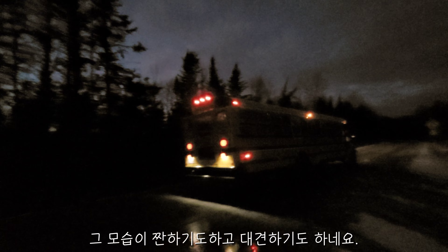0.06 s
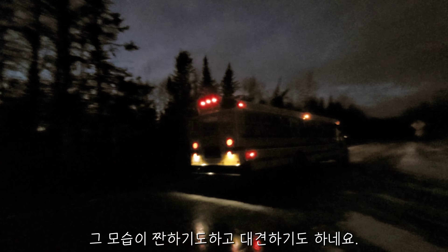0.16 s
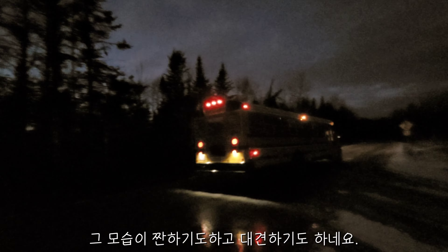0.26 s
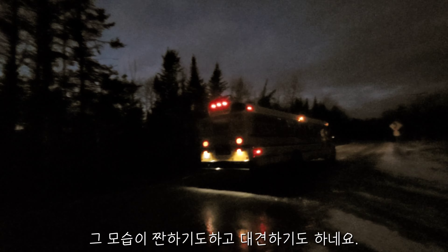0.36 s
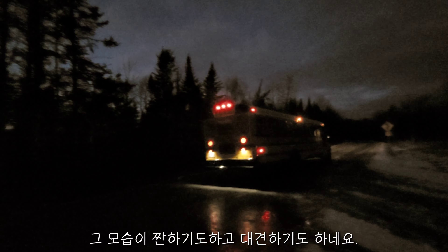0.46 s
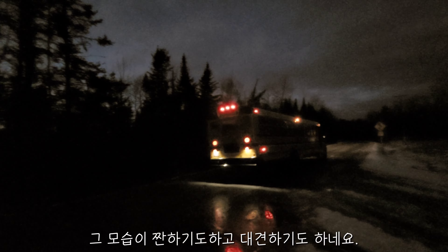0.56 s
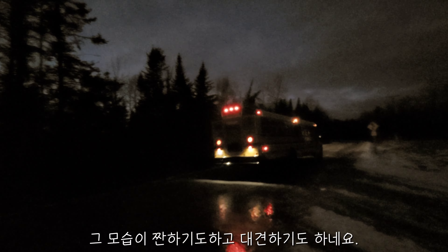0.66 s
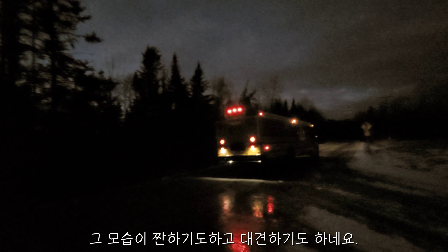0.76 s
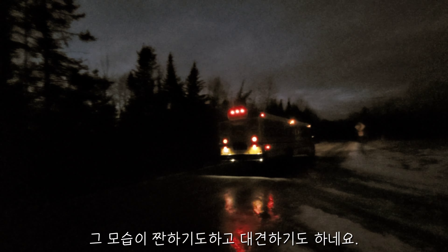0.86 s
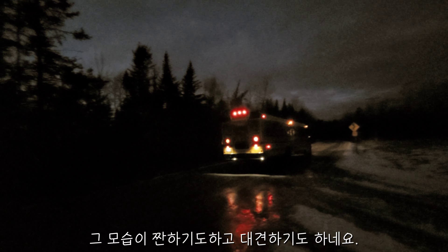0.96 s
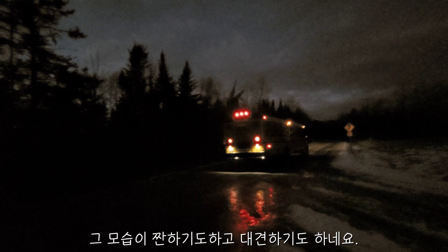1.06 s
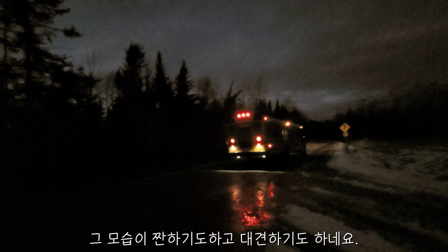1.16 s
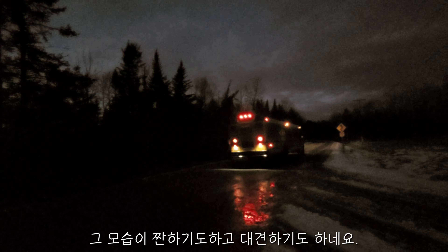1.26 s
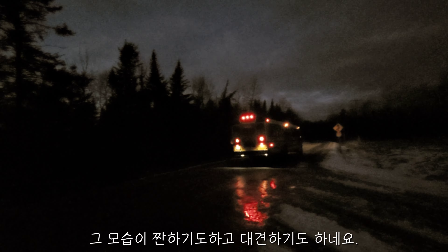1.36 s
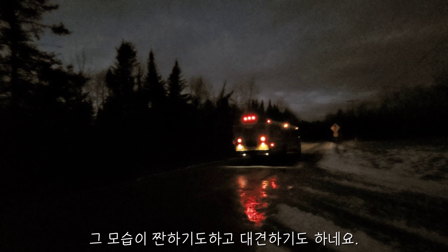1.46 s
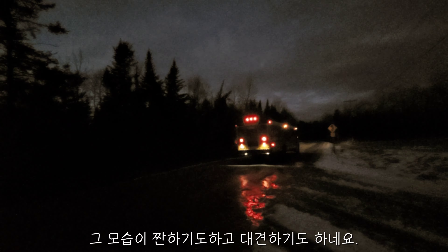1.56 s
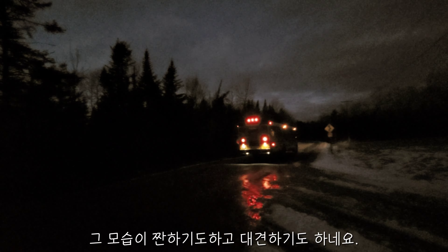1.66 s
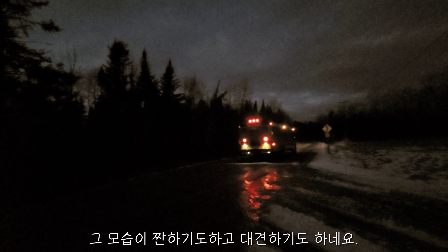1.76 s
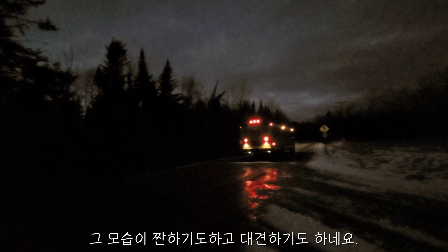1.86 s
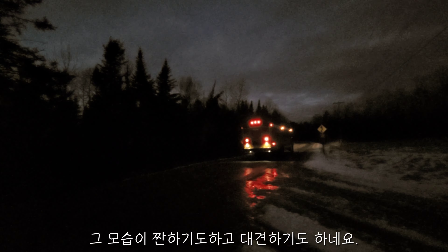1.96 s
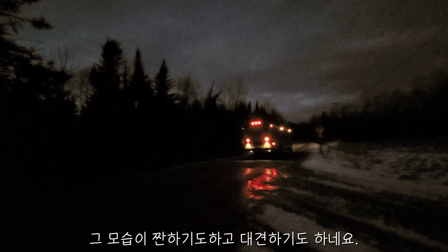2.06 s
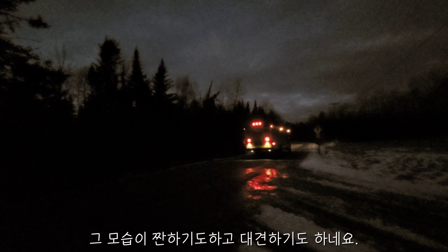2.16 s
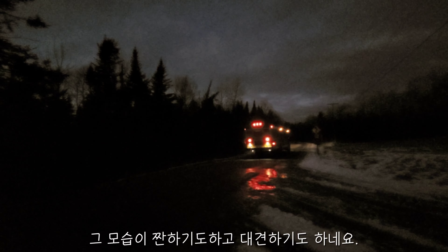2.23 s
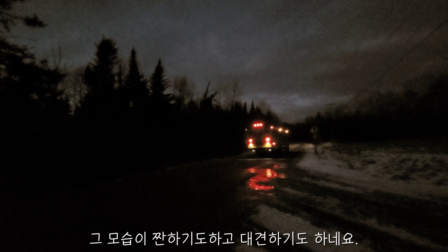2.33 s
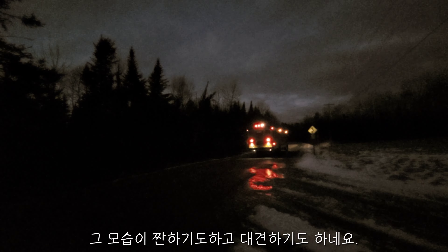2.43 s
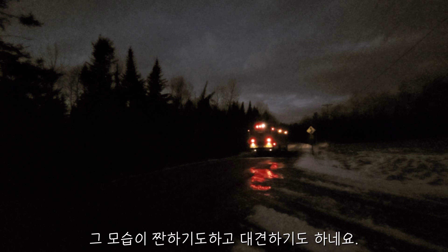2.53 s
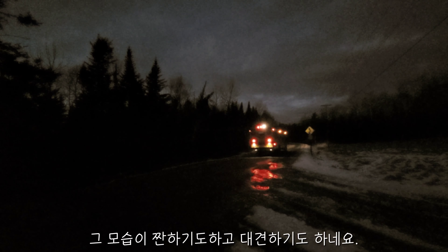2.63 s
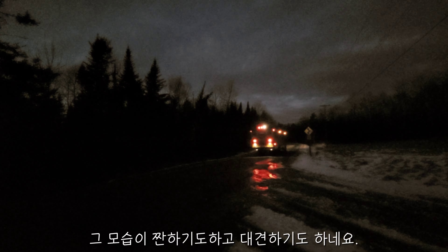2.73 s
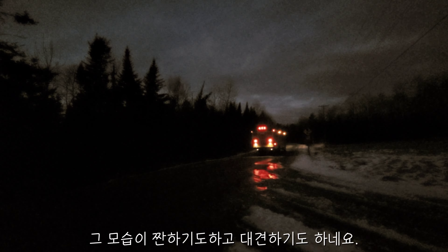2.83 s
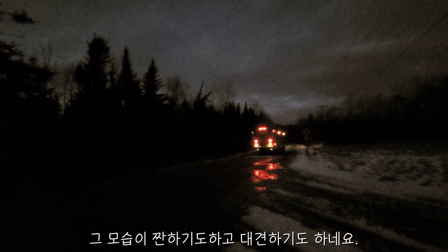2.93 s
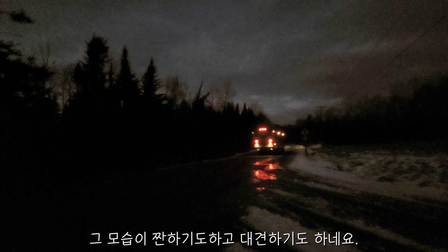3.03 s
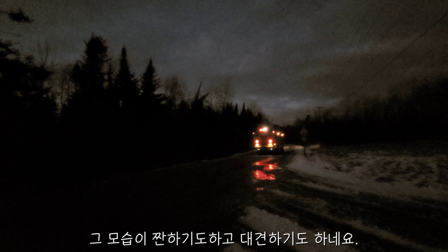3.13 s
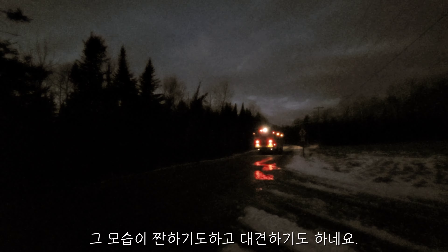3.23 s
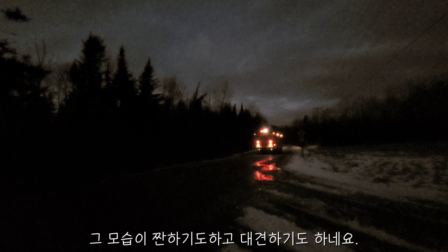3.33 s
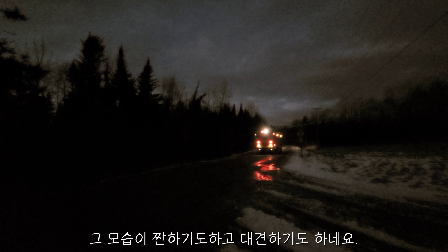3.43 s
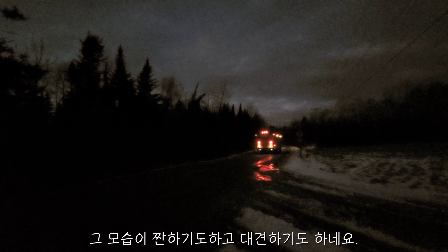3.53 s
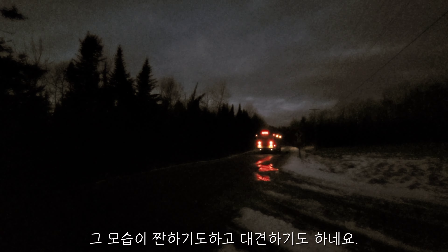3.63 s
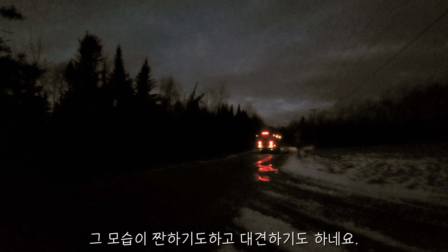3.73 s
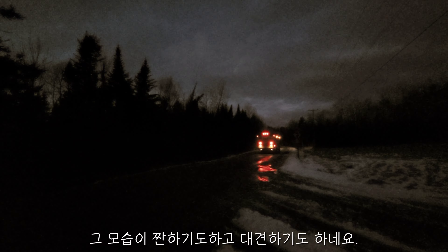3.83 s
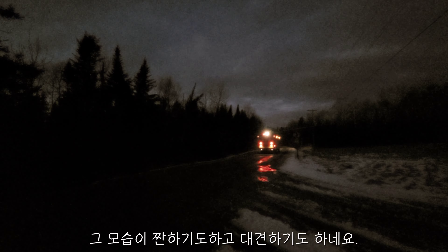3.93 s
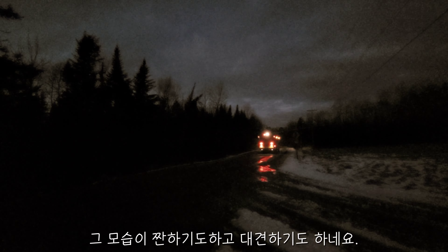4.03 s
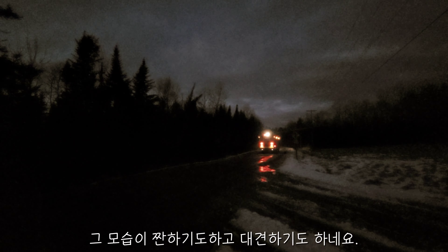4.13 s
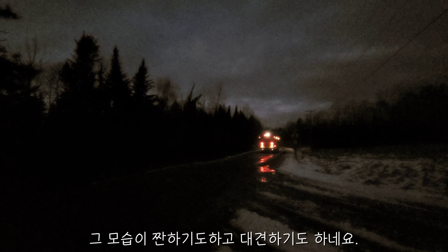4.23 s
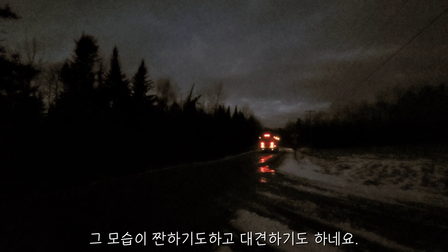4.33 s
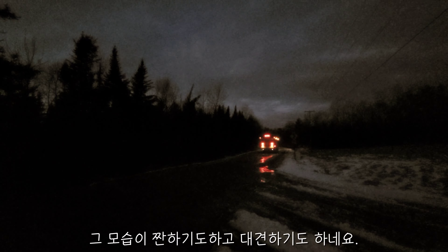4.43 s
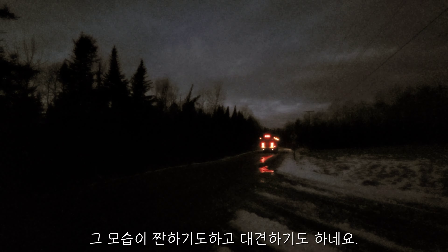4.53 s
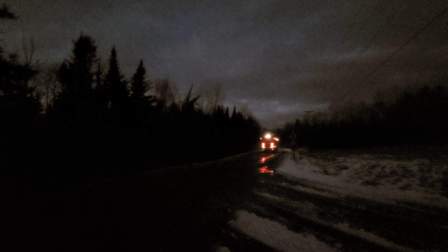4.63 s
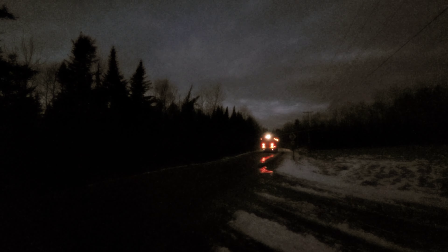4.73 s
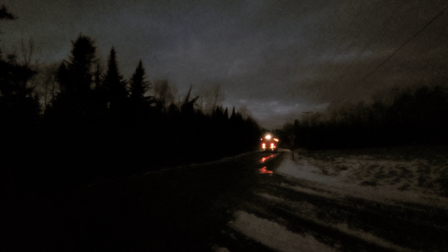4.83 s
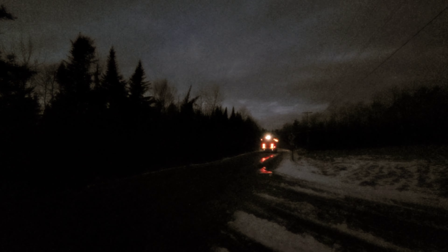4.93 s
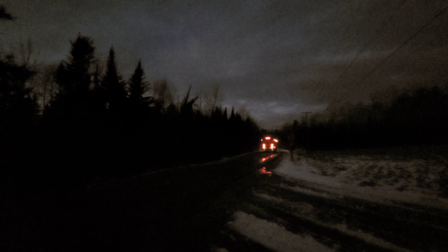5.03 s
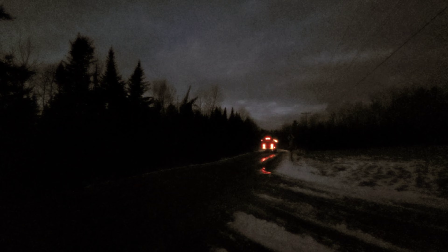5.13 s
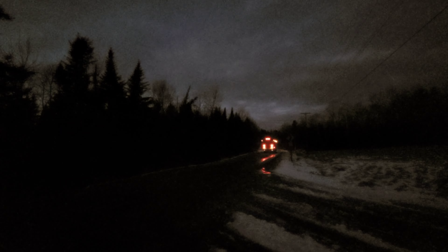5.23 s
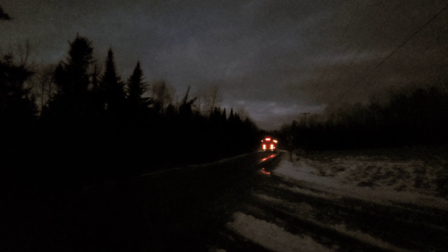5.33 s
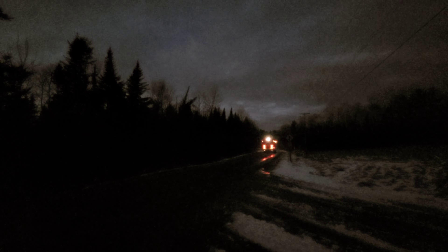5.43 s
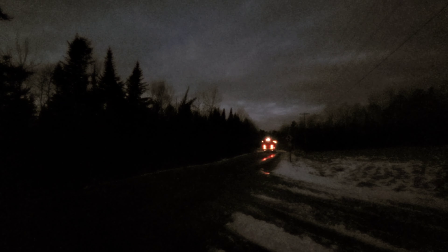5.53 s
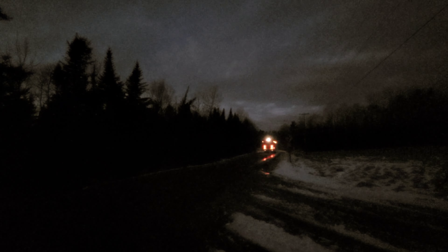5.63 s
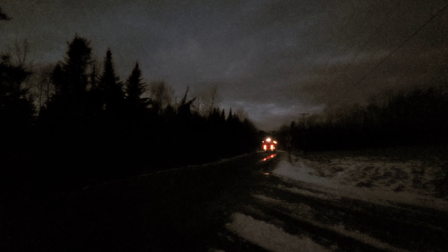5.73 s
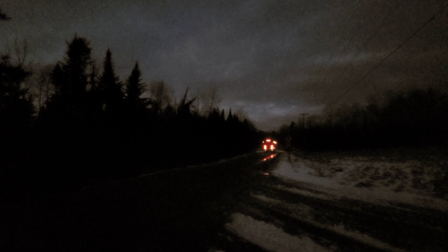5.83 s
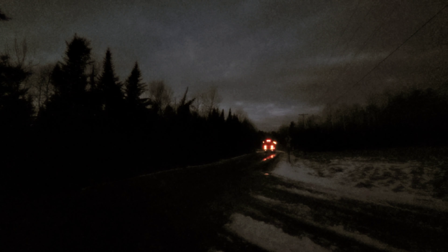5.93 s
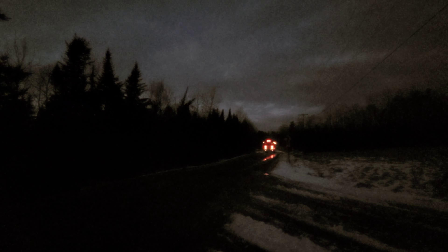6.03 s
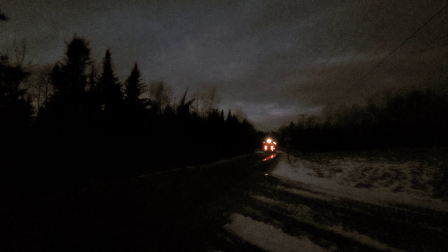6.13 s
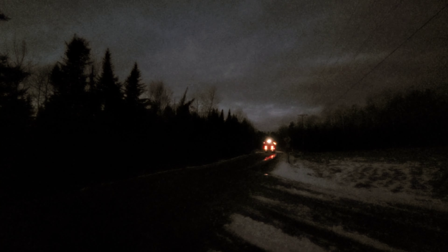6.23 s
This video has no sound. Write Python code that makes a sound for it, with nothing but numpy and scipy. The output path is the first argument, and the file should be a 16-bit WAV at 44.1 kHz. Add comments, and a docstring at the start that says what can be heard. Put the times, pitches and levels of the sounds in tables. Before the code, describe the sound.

Outdoors at a quiet roadside, a diesel bus drives away from a stationary microphone. A deep exhaust hum dominates, with a brief clatter of engine knocks at the start. The pitch drops at a gear change, climbs, drops again midway and rises once more, rasping in short surges. Wet tyres hiss and spit, growing duller and fainter with distance.

```python
"""A diesel school bus pulls away down a wet road, heard from the roadside.
Its engine climbs and drops at two gear changes; the exhaust, a resonator driven by the firing, booms
as the firing rate passes its resonance, and rasps in separate surges of harmonics and noise puffs.
The engine rumbles in cylinder orders and clatters while near, in knocks of noise and ringing.
The tyres hiss and spit on the wet asphalt, in filtered noise and drops, and dull with distance."""
import sys
import numpy as np
from scipy import signal
from scipy.fft import rfft, irfft
from scipy.io import wavfile
from scipy.ndimage import map_coordinates

SR = 44100
rng = np.random.default_rng(int(sys.argv[2]) if len(sys.argv) > 2 else 0)


def int16_out(signal):
    """Quantize to a 16-bit WAV file."""
    q = np.round(np.clip(np.atleast_2d(signal).T, -1, 1) * 32767)
    wavfile.write(sys.argv[1], SR, q.astype(np.int16))


N = 277389

# engine course: time_s, firing_hz
FIRING_COURSE = [(0.0, 102.3), (0.24, 101.2), (0.51, 103.9), (0.62, 91.69), (1.03, 89.72), (1.17, 95.62),
                 (1.36, 92.08), (1.48, 98.85), (1.77, 98.88), (1.86, 105), (2.06, 102.4), (2.14, 107.0),
                 (2.94, 115.4), (3.18, 97.63), (3.33, 92.34), (3.54, 92.8), (3.71, 95.93), (3.87, 93.2),
                 (3.97, 99.1), (4.12, 96.2), (4.24, 99.2), (4.45, 98.7), (4.53, 102.3), (4.65, 101.1),
                 (4.73, 105.5), (4.88, 102.9), (5.0, 105.8), (6.29, 113.5)]
# exhaust pipe spectrum: freq_hz, gain_db
PIPE_SPECTRUM = [(300, 10), (400, 2.5), (500, -3), (600, -6.5), (720, -10), (820, -16), (900, -20),
                 (990, -37.5), (1300, -44)]
# turbulent exhaust gas spectrum: freq_hz, gain_db
GAS_SPECTRUM = [(60, -19.5), (140, 2.5), (350, -1.5), (700, 2), (850, -17.0), (1000, -36), (4000, -74)]
# surges in which the exhaust rasps: start_s, hold_s, gain_db
EXHAUST_SURGES = [(0.55, 0.02, -3.5), (1.302, 0.01007, -8.5), (1.559, 0.242, 2.3), (2.039, 0.0197, -7.5),
                  (3.184, 0.0615, -4), (4.04, 0.051, 1), (4.3, 0.1752, 0), (4.63, .06, -4.5)]
# body rumble spectrum: freq_hz, gain_db
RUMBLE_SPECTRUM = [(15, -31), (30, -15), (48, -5.5), (66, 1.5), (85, -4.5), (125, -2.5), (160, -3.5),
                   (180, -12.5), (240, -6), (330, -13), (400, -23), (600, -39.5), (1200, -55)]
# block clatter spectrum: freq_hz, gain_db
CLATTER_SPECTRUM = [(300, -32), (480, -21.5), (610, -4), (720, -5), (820, -2), (1000, -1), (1090, -20.5),
                    (1300, -14.5), (1520, -20), (2200, -16), (3000, -34), (8000, -40.5)]
# orders at which the engine block rings: firing_multiple, gain_db
BLOCK_ORDERS = [(5, -11), (6, -3), (7, 0), (8, -9), (9, -13)]
# tread roar spectrum: freq_hz, gain_db
ROAR_SPECTRUM = [(100, -12), (350, 12.5), (460, 4.5), (600, 1), (840, 10), (940, -2.5), (1020, -5.5),
                 (1230, 2), (1470, -1.5), (1660, -1.5), (1950, -6), (2300, -5), (2700, -11), (5000, -18),
                 (8000, -29), (8700, -40), (16000, -66)]
# spray spectrum: freq_hz, gain_db
SPRAY_SPECTRUM = [(500, 4), (1500, 7.5), (3000, 6.5), (5400, 5), (6800, 1), (8000, -0.5), (8600, -4.5),
                  (11500, -3), (16000, -6.5)]
# wetter stretches that alter the tyre noise: centre_s, half_length_s, roar_change_db, spray_change_db
WET_STRETCHES = [(.06, 0.049, 1.5, 3), (.6, .1, 4, 3.5), (1.3, .1, 0, 3), (1.786, 0.28, 1.62, 0.5),
                 (2.293, .06, -1, 4.5), (3.1, 0.1192, 2.5, 1), (3.444, 0.322, 2.5, 0),
                 (6.204, 0.163, 2.5, 5.5)]
# small splashes from the wet road: start_s, gain_db, centre_hz, decay_s
ROAD_SPLASHES = [(.071, -42, 4400, 0.0088), (0.16, -40.5, 4200, 0.0074), (0.569, -45.5, 3500, 0.005),
                 (0.751, -38.5, 1750, 0.0059), (.858, -38.5, 1500, 0.00792), (.92, -43.5, 4000, .008),
                 (1.212, -41.5, 3000, 0.01), (1.301, -38, 700, 0.012), (1.43, -42, 1250, 0.011),
                 (1.73, -53, 6224, .004), (3.028, -40.5, 1890, .012), (3.072, -45, 1400, .015),
                 (3.478, -42.5, 1400, 0.01527), (4.863, -46, 1900, .012)]
# left-right likeness: freq_hz, likeness_0_to_1
PORT_LIKENESS = [(50, 0.864), (300, 0.988), (750, 0.961), (1020, 0.26), (1300, 0.52), (1900, 0.56),
                 (2250, 0.52), (2800, 0.14), (5000, 0.059), (15000, .2)]
# phase by which the left port leads: freq_hz, lead_rad
PORT_LEAD = [(0, 0.61), (100, 0.7), (700, 0.49), (1000, 1.785), (1200, 0.34), (1720, 5.71), (2240, 7.01),
             (2600, 9), (4200, 16), (7400, 23.84), (15000, 21.43)]
# left minus right: freq_hz, balance_db
PORT_BALANCE = [(60, -.7), (150, -.8), (380, -3.2), (700, -1.8), (1290, .5), (2380, -.3), (4400, 3.5),
                (8120, 1.5), (15000, 5)]

T = np.arange(N) / SR
HZ = np.fft.rfftfreq(N, 1 / SR)

# the bus draws away at a steady pace
START_M, SPEED_M_PER_S = 15.54, 7.907
# as it straightens up, the tailpipe swings out from behind the body and the engine goes behind it
TURN_S, PIPE_SCREEN_DB, ENGINE_SCREEN_DB = 0.502, -11, -20
# random wander of the firing rate
WANDER_HZ, WANDERS_PER_S = 0.2, 12
# exhaust resonance
BOOM_HZ, BOOM_WIDTH_HZ, BOOM_DB = 98.726, 5.263, -6.5
# the air makes the boom waver more with distance
WAVER_DB, WAVERS_PER_S = 2.11, 15
# a strong swing steepens the wave: the second order grows as this power of it
STEEPENING_POWER = 1.976
# the silencer rings where the third order meets it
SILENCER_HZ, SILENCER_WIDTH_HZ = 272.87, 20.3
SURGE_ATTACK_S, SURGE_RELEASE_S = 0.0642, 0.0607
# rasp gains: in a surge of 0 dB, and of the underlying part at the start
RASP_DB, RASP_REST_DB = -34, -56.5
# base gains, and the exponent of the distance loss
RUMBLE_DB, RUMBLE_LOSS = -24, 0.848
CLATTER_DB, CLATTER_LOSS = -32, 1
ROAR_DB, ROAR_LOSS = -39, 0.529
SPRAY_DB, SPRAY_LOSS = -46.5, 1.052
# far down the road the spray dies away
SPRAY_FADE_S, SPRAY_FADE_DB_PER_S = 3.817, 11.5
# a close reflection arrives a little later as the bus draws ahead
ECHO_NEAR_S, ECHO_FAR_S, ECHO_SHARE = 0.00154, 0.0019626, 0.262
BAND_EDGE_HZ = 15750


def amp(db):
    """Decibels to gain."""
    return 10 ** (np.asarray(db) / 20)


def unit(x):
    """Scales to rms 1."""
    return x / np.sqrt(np.mean(x ** 2) + 1e-20)


def read(points, hz):
    """Reads a frequency table on a log axis."""
    f, value = np.transpose(points)
    return np.interp(np.log(hz + 1), np.log(f + 1), value)


def colour(x, points):
    """Filters by a spectrum and scales to rms 1."""
    return unit(irfft(rfft(x) * amp(read(points, HZ)), N))


def drift(rate_hz):
    """Slow random drift of rms 1, up to about the given rate."""
    return unit(irfft(rfft(rng.standard_normal(N)) * np.exp(-(HZ / rate_hz) ** 2), N))


def ports(pair):
    """Two unrelated signals become the partly alike sound at two microphone ports."""
    a, b = rfft(pair)
    same = np.clip(read(PORT_LIKENESS, HZ), 0, 1)
    lag = np.exp(-1j * np.interp(HZ, *np.transpose(PORT_LEAD)))
    right = (same * a + np.sqrt(1 - same ** 2) * b) * lag
    return irfft(np.array([a, right]), N)


def nearness():
    """Spreading loss as a gain: 1 at the start, falling as the bus draws away."""
    return START_M / (START_M + SPEED_M_PER_S * T)


def turned(sharpness=3.2):
    """From 0 towards 1 as the bus turns its tail to the listener."""
    return 1 - 1 / (1 + (T / TURN_S) ** sharpness)


def pipe_swing(turns, hz):
    """The firing drives the exhaust's narrow resonance: its swing (1 in tune) and its cycle count."""
    pole = np.exp((-np.pi * BOOM_WIDTH_HZ + 2j * np.pi * BOOM_HZ) / SR)
    gain = 1 - abs(pole)
    # start as if already running at the first firing rate
    settled = gain / (1 - pole * np.exp(-2j * np.pi * hz[0] / SR))
    drive = np.exp(2j * np.pi * turns)
    wave = signal.lfilter([gain], [1, -pole], drive, zi=[pole * settled])[0]
    return abs(wave), np.unwrap(np.angle(wave)) / (2 * np.pi)


def boom(swing, pipe_turns, flutter_db=0.53):
    """The resonance booms from the tailpipe; it wavers when far away and out of tune."""
    waver_db = WAVER_DB * (1 - nearness()) * (1 - swing) * drift(WAVERS_PER_S)
    gain = amp(BOOM_DB + waver_db + flutter_db * drift(33)) * nearness()
    return np.sqrt(2) * gain * swing * np.cos(2 * np.pi * pipe_turns)


def second_order(turns, swing, pipe_turns, plain_db=-33.5, swell_db=-24.5, loss=0.79,
                 flutter_db=1.02, waver_db=2.5):
    """An octave above the boom: a part from the firing and a part that swells with the resonance."""
    plain = amp(plain_db + waver_db * drift(7.7)) * np.cos(4 * np.pi * turns)
    swell = amp(swell_db) * swing ** STEEPENING_POWER * np.cos(4 * np.pi * pipe_turns)
    return -np.sqrt(2) * (plain + swell) * nearness() ** loss * amp(flutter_db * drift(19))


def surge():
    """Gain of the surges: each swells, holds and falls away."""
    total = 0
    for start_s, hold_s, gain_db in EXHAUST_SURGES:
        before = np.maximum(start_s - T, 0) / SURGE_ATTACK_S
        after = np.maximum(T - start_s - hold_s, 0) / SURGE_RELEASE_S
        total = total + amp(gain_db) * np.exp(-before ** 2 - after ** 2)
    return total


def third_order(turns, hz, pipe_turns, plain_db=-23.0, plain_loss=1.632, direct_db=-41.0,
                direct_loss=0.775, swell_db=-26.5, swell_loss=0.984, flutter_db=2.37):
    """A faint line that drones in the silencer at low engine speed and swells in the surges."""
    silencer = 1 / np.hypot(1, 2 * (3 * hz - SILENCER_HZ) / SILENCER_WIDTH_HZ)
    drone = amp(plain_db) * nearness() ** plain_loss * silencer
    direct = amp(direct_db) * nearness() ** direct_loss
    plain = (drone + direct) * np.cos(6 * np.pi * turns)
    swell = amp(swell_db) * nearness() ** swell_loss * surge() * np.cos(6 * np.pi * pipe_turns)
    return -np.sqrt(2) * (plain + swell) * amp(flutter_db * drift(12))


def rasp(turns, hz, gas_db=-6.5, puff_share=0.19, ground_db_per_s=1.4, ground_hz=385,
         ground_width_hz=70, roughness=0.08, dispersion_rad=0.04):
    """Each exhaust cycle gives a pulse, smeared by the pipe, and a puff of turbulent gas; surges swell both."""
    gain = amp(RASP_DB) * surge() + amp(RASP_REST_DB) * nearness()
    pulses = 0
    for k in range(4, 11):
        # with distance the ground reflection cancels one low band more and more
        dip_db = ground_db_per_s * T * np.exp(-((k * hz - ground_hz) / ground_width_hz) ** 2)
        phase = 2 * np.pi * k * turns - dispersion_rad * (k - 4) ** 2
        pulses -= amp(read(PIPE_SPECTRUM, k * hz) - dip_db) * np.cos(phase)
    puffs = np.exp(-(turns % 1) / puff_share) * rng.standard_normal(N)
    gas = colour(puffs, GAS_SPECTRUM)
    return gain * (unit(pulses) * (1 + roughness * drift(70)) + amp(gas_db) * gas)


def rumble(turns, hz, orders_db=-5.5, noise_db=-7.5, waver=0.795):
    """Six unequal cylinders put weak lines between the firing orders, over the body's rumble."""
    lines = 0
    for k in range(2, 24):
        if k % 6:  # skip the firing orders
            level = amp(read(RUMBLE_SPECTRUM, k * hz / 6)) * (1 + waver * drift(5))
            lines = lines + level * np.cos(2 * np.pi * (k * turns / 6 + rng.random()))
    noise = colour(ports(rng.standard_normal((2, N))), RUMBLE_SPECTRUM)
    gain = amp(RUMBLE_DB) * nearness() ** RUMBLE_LOSS
    return gain * (amp(orders_db) * unit(lines) + amp(noise_db) * noise)


def clatter(turns, knock_share=0.31, uneven_db=2.1, ring_db=-1.0):
    """Each firing knocks the block, harder on some cylinders: a rattle of noise and a pitched ring."""
    gain = amp(CLATTER_DB + ENGINE_SCREEN_DB * turned()) * nearness() ** CLATTER_LOSS
    strength = amp(uneven_db * np.cos(2 * np.pi * turns / 3))  # repeats every three firings
    knock = np.exp(-(turns % 1) / knock_share)
    rattle = colour(ports(knock * rng.standard_normal((2, N))), CLATTER_SPECTRUM)
    ring = unit(sum(amp(db) * np.cos(2 * np.pi * k * turns) for k, db in BLOCK_ORDERS))
    return gain * unit(strength * (rattle + amp(ring_db) * ring))


def tyres(drops_per_s=1500, drop_spread_db=4.5, drops_db=-5.5, flicker_db=1.0, swell_db=0.87):
    """Tread roars on the road and flings a mist of droplets, which fades first with distance."""
    roar_db = ROAR_DB + swell_db * drift(8.5)
    fade_db = SPRAY_FADE_DB_PER_S * np.maximum(T - SPRAY_FADE_S, 0)
    spray_db = SPRAY_DB + swell_db * drift(7.1) - fade_db
    for centre_s, half_length_s, roar_change_db, spray_change_db in WET_STRETCHES:
        inside = np.exp(-((T - centre_s) / half_length_s) ** 2)
        roar_db = roar_db + roar_change_db * inside
        spray_db = spray_db + spray_change_db * inside
    tread_noise = rng.standard_normal((2, N)) * amp(flicker_db * drift(65))
    tread = colour(ports(tread_noise), ROAR_SPECTRUM)
    sizes = amp(drop_spread_db * np.minimum(rng.exponential(1, (2, N)), 5.5))
    drops = sizes * rng.standard_normal((2, N)) * (rng.random((2, N)) < drops_per_s / SR)
    mist = rng.standard_normal((2, N)) * amp(flicker_db * drift(60))
    water = colour(ports(mist + amp(drops_db) * unit(drops)), SPRAY_SPECTRUM)
    roar = amp(roar_db) * nearness() ** ROAR_LOSS * tread
    spray = amp(spray_db) * nearness() ** SPRAY_LOSS * water
    return roar + spray


def splashes(width_octaves=0.672):
    """Each splash is a short burst of noise around its own pitch."""
    out = np.zeros((2, N))
    noise = rfft(ports(rng.standard_normal((2, N))))
    for start_s, gain_db, centre_hz, decay_s in ROAD_SPLASHES:
        window = np.exp(-(np.log2((HZ + 1) / centre_hz) / width_octaves) ** 2)
        band = unit(irfft(noise * window, N))
        out += amp(gain_db) * band * (T >= start_s) * np.exp(-abs(T - start_s) / decay_s)
    return out


def reflected(pair):
    """Adds one close echo, whose comb of peaks slides down as its delay grows."""
    delay_s = ECHO_FAR_S + (ECHO_NEAR_S - ECHO_FAR_S) * nearness()
    echo = np.array([map_coordinates(c, [(T - delay_s) * SR], order=3) for c in pair])
    return pair + ECHO_SHARE * echo


def scene(port_lag_s=0.000141):
    """One crankshaft drives exhaust, rumble and clatter; the tyres run beside them."""
    hz = np.interp(T, *np.transpose(FIRING_COURSE)) + WANDER_HZ * drift(WANDERS_PER_S)
    turns = np.cumsum(hz) / SR  # one turn per firing
    swing, pipe_turns = pipe_swing(turns, hz)
    low = boom(swing, pipe_turns) + second_order(turns, swing, pipe_turns)
    high = third_order(turns, hz, pipe_turns) + rasp(pipe_turns, hz)
    screen = amp(PIPE_SCREEN_DB * (1 - turned()))  # only the longest waves bend round the body
    left = low + screen * high
    right = np.interp(T - port_lag_s, T, left)
    tailpipe = np.array([left, right])
    return tailpipe + rumble(turns, hz) + clatter(turns) + reflected(tyres() + splashes())


def record(dry):
    """The two ports differ a little in colour; then a low-pass limits the band."""
    tilt = amp(np.array([[0.5], [-0.5]]) * read(PORT_BALANCE, HZ))
    heard = irfft(rfft(dry) * tilt, N)
    lowpass = signal.firwin(511, BAND_EDGE_HZ, window=("kaiser", 9), fs=SR)
    return signal.oaconvolve(heard, lowpass[None], "same")


dry = scene()
out = record(dry)
int16_out(out)
```